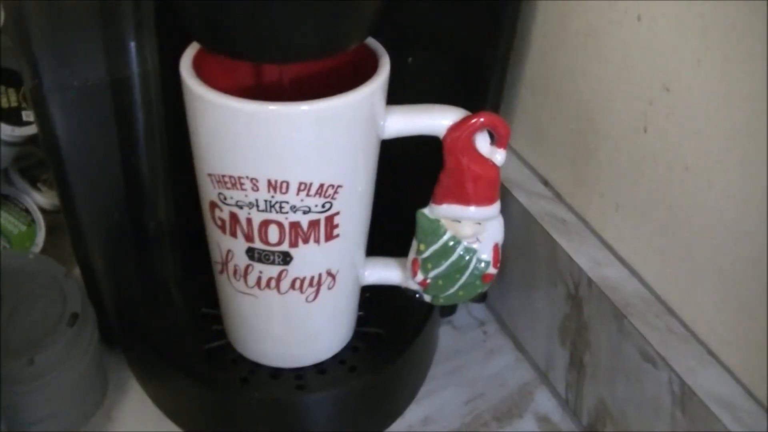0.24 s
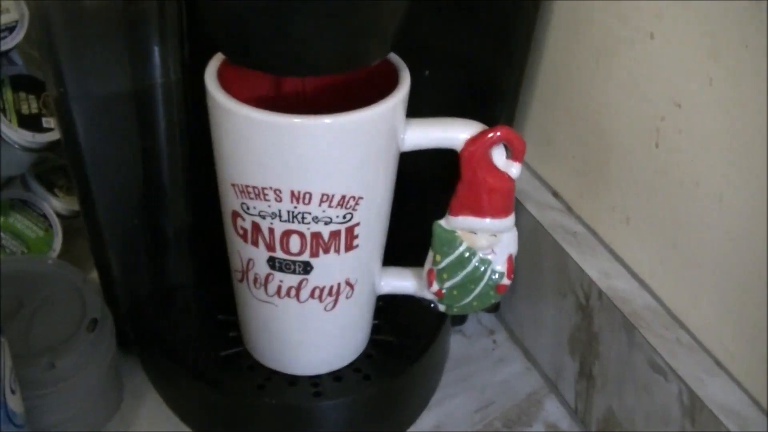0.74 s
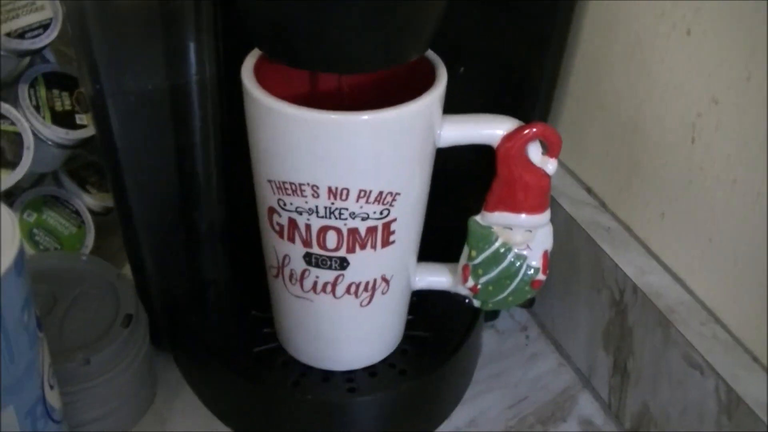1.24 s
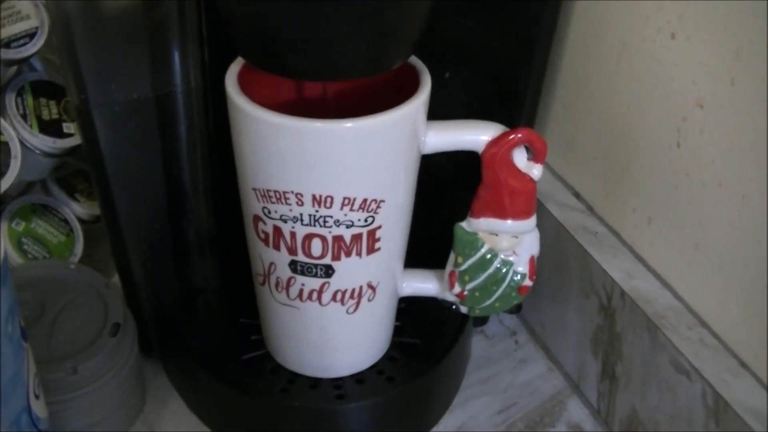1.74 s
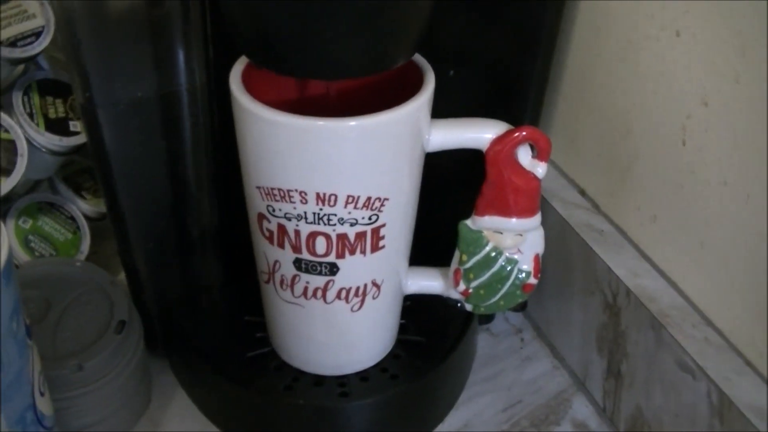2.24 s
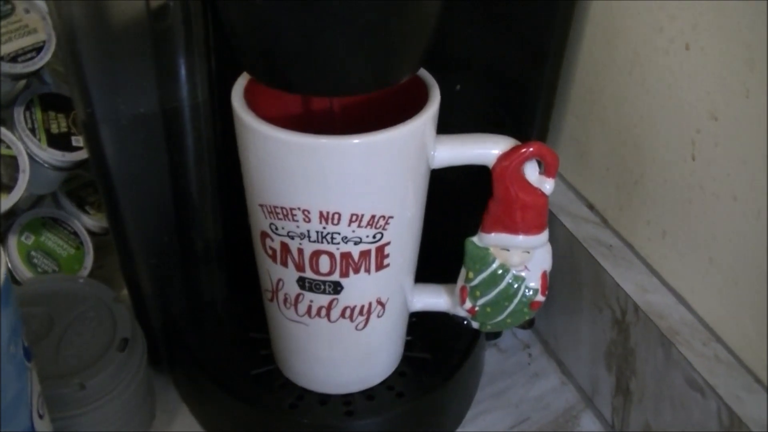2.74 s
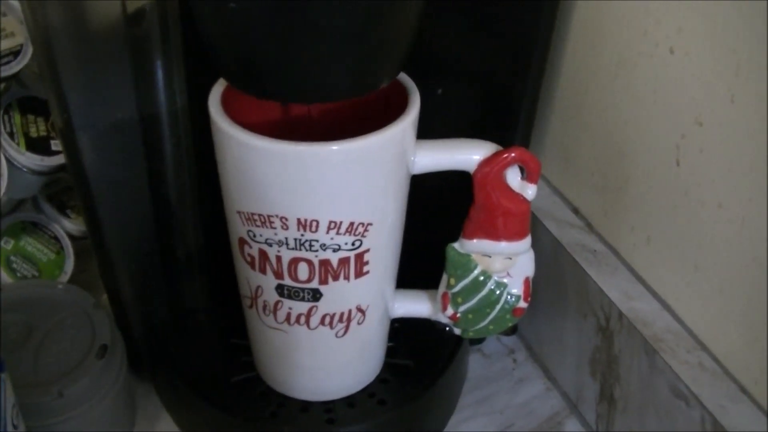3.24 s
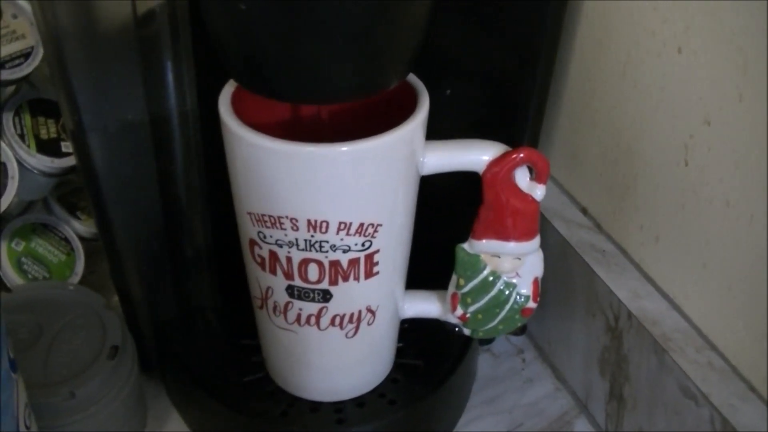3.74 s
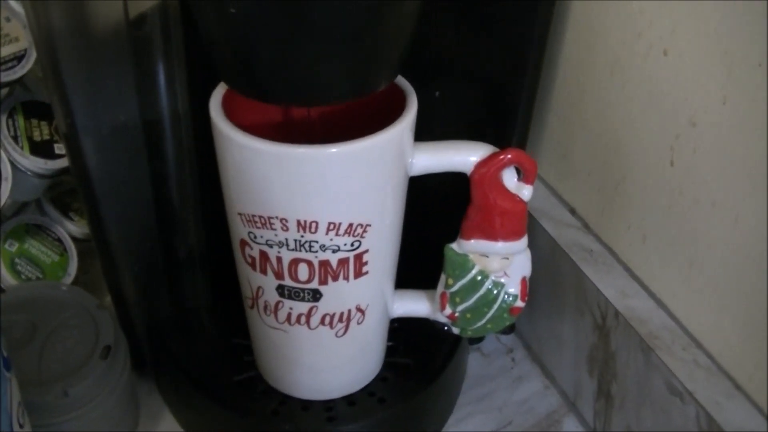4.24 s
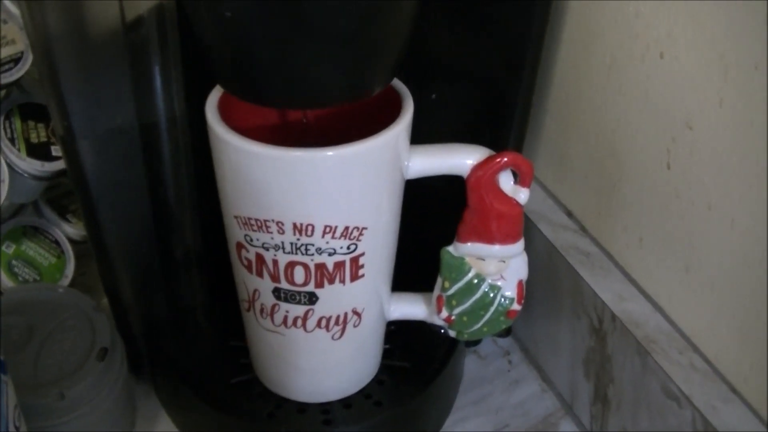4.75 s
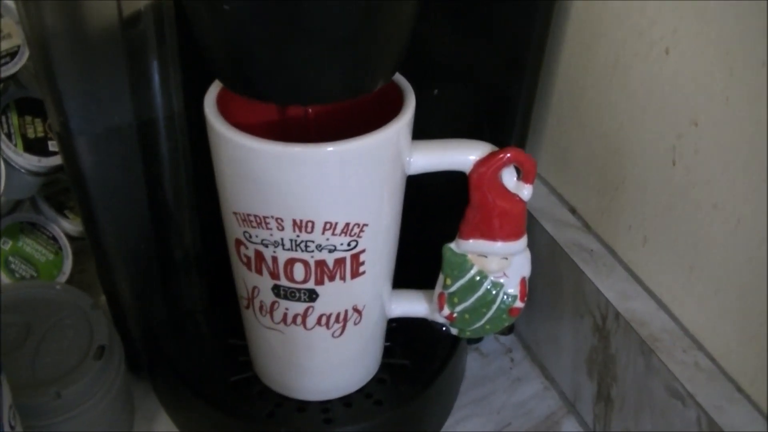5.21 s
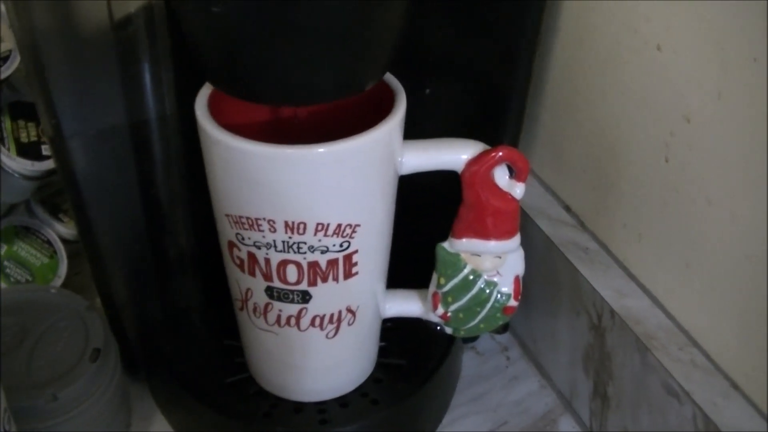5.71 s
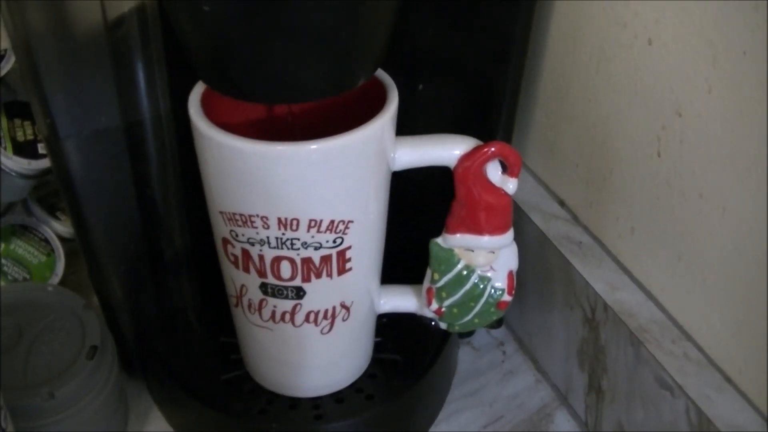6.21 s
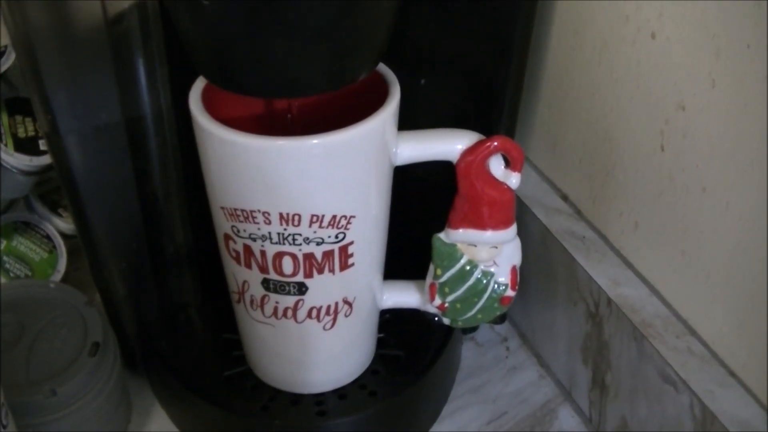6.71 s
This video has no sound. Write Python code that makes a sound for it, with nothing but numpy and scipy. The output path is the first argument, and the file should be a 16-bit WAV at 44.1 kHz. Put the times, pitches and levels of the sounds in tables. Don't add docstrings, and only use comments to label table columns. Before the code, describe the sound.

A continuous buzzing hum with a hard plastic rattle and a hiss of water through tubes, already running at the start. Two sharp splats in the mug open it, followed by irregular drips and small bubble plinks. A very faint high electronic whine sits above. After about six seconds the motor cuts off quickly, leaving uneven bubbly pops, wheezes and spray. Close stereo phone pickup, short counter reflections, faint room tone.

```python
import sys
import numpy as np
from scipy import signal
from scipy.fft import rfft, irfft, next_fast_len
from scipy.io import wavfile
from scipy.ndimage import uniform_filter1d

SR = 44100
rng = np.random.default_rng(int(sys.argv[2]) if len(sys.argv) > 2 else 0)


def wrap_up_sound(samples):
    columns = np.atleast_2d(samples).T
    tamed = np.clip(columns, -1, 1)
    steps = np.round(tamed * 32767).astype(np.int16)
    wavfile.write(sys.argv[1], SR, steps)


def decibels_to_gain(level_db):
    exponent = np.asarray(level_db, float) / 20
    return 10 ** exponent


N = 307377
TIME = np.arange(N) / SR
SIZE = next_fast_len(N + 8192)
HZ = np.maximum(np.arange(SIZE // 2 + 1) * SR / SIZE, 1)


def unit(x):
    return x / np.sqrt(np.mean(x ** 2))


def along(table):
    hz, value = np.transpose(table)
    return np.interp(np.log(HZ), np.log(np.maximum(hz, 1)), value)


def colour(x, table):
    cepstrum = irfft(np.log(decibels_to_gain(along(table))), SIZE)
    cepstrum[1:SIZE // 2 + 1] *= 2
    cepstrum[SIZE // 2 + 1:] = 0
    response = np.exp(rfft(cepstrum))
    return irfft(rfft(x, SIZE) * response, SIZE)[:N]


def resonate(x, modes):
    gain = 0
    for k, (hz, width, db) in enumerate(modes):
        damping = 1j * HZ * width
        gain = gain + (-1) ** k * decibels_to_gain(db) * damping / (hz ** 2 - HZ ** 2 + damping)
    return irfft(rfft(x, SIZE) * gain, SIZE)[:N]


def columns(table):
    s, *rest = np.transpose(table)
    on = (TIME >= s[0]) & (TIME <= s[-1])
    return on, [np.interp(TIME, s, c) for c in rest]


def walk(rate, time=TIME):
    knots = uniform_filter1d(rng.standard_normal(400), size=2) * 2.08
    return np.interp(time * rate, np.arange(400), knots)


def grains(per_s, spread_db):
    chance = rng.random((2, N))
    happens = chance[0] < per_s / SR
    size = decibels_to_gain(-spread_db * np.log(1 - 0.95 * chance[1]))
    return happens * size * rng.choice([-1, 1], N)


def add(out, s, sound):
    i = int(s * SR)
    out[i:i + len(sound)] += sound[:N - i]


def fade(t60, rise):
    t = TIME[:8000]
    return (1 - np.exp(-t / rise)) * np.exp(-np.log(1000) * t / max(t60, 0.002))


def burst(t60, rise):
    return fade(t60, rise) * rng.standard_normal(8000)


def bubble(hz, glide):
    t = TIME[:8000]
    return np.sin(2 * np.pi * hz * t * (1 + glide * t))


# frequency in Hz, level in dB per Hz.
ROOM_TONE = [(12, -84), (20, -54), (216, -13), (738, -1), (976, -9), (1120, -6), (2750, -11), (3630, -18),
             (9950, -25), (14300, -32), (16000, -49)]


def kitchen():
    mid, side = (unit(colour(rng.standard_normal(N), ROOM_TONE)) for _ in range(2))
    return decibels_to_gain(-56) * (mid + 0.71 * side * np.array([[1], [-1]]))


# frequency in Hz, level in dB.
HEATER_TONES = [(9926, -67), (10016, -59), (10106, -71)]


def whine():
    load = decibels_to_gain(np.interp(TIME, [6.12, 6.18], [0, -8]))
    out = 0
    for hz, db in HEATER_TONES:
        level = decibels_to_gain(db + 0.6 * walk(6))
        out = out + level * np.cos(2 * np.pi * hz * TIME + 0.2 * walk(22))
    return load * out


# start in seconds, peak in dB, dull body against tick in dB.
DROP_HITS = [(0.8434, -48, -3), (0.8982, -42, 5.5), (1.3038, -31.5, -10), (1.3452, -40, -9),
             (1.5438, -35, -13), (1.647, -30.5, -5), (2.0636, -45, -6), (2.2262, -41, 3.5),
             (2.84, -41, -20), (3.1446, -44, -7), (3.1596, -27, -9), (3.3472, -45, -5), (3.5487, -26, -21),
             (3.8161, -37, 1), (3.9932, -41, -7), (4.5, -42, -10), (4.7006, -33, -2), (5.5347, -36, -13),
             (6.2052, -34, 6.5), (6.2596, -44, -10), (6.5105, -34.5, 2), (6.6886, -38, -6),
             (6.7065, -37, -10), (6.7494, -43, -7), (6.8068, -44, 1), (6.8343, -38, -9), (6.8552, -43, 3)]
# start in seconds, peak in dB, pitch in Hz.
DROP_BUBBLES = [(.02, -27, 2490), (.378, -27, 2300), (.515, -30, 3700), (.535, -29, 2800),
                (.545, -25, 2220), (.575, -28, 2600), (0.899, -26, 2500), (.898, -32, 4080),
                (1.304, -25, 3970), (1.304, -28, 2900), (1.6, -35, 930), (2.2, -28, 924),
                (2.204, -32, 1280), (2.88, -40, 920), (3.5, -36, 910), (3.789, -33, 1224), (4.7, -30, 1390),
                (5.06, -31, 1230)]


def drops():
    tick, body, ring = np.zeros((3, N))
    for s, db, body_db in DROP_HITS:
        add(tick, s, decibels_to_gain(db + 2) * burst(0.024, 0.00063))
        add(body, s, decibels_to_gain(db + body_db) * burst(0.012, 0.0005))
    for s, db, hz in DROP_BUBBLES:
        add(ring, s, decibels_to_gain(db) * fade(50 / hz, 0.001) * bubble(hz, 1.5))
    bright = resonate(tick, [(10400, 3200, 1), (12600, 2300, -14)])
    dull = resonate(body, [(5000, 13000, 5.4)])
    return bright + dull + ring


# start in seconds, spray in dB, mug ring in Hz,
# ring against spray in dB, snap against spray in dB.
SLUGS = [
    (0.0703, -24, 1150, -12, 13.5),
    (0.1205, -20.5, 852, -1.5, 13.5),
    (6.2036, -25, 1280, -4, -20),
    (6.509, -31.5, 1010, 3, -15),
]
# frequency in Hz, width in Hz, level in dB.
SNAP_MODES = [(1470, 1300, -10), (2600, 590, -3), (4000, 400, -5), (6300, 600, 2), (8400, 1900, -10),
              (10600, 1500, 3), (12800, 2800, -9.5)]
# frequency in Hz, width in Hz, level in dB.
SPLASH_MODES = [(1300, 860, -1.5), (2700, 600, -0.5), (4160, 750, -8), (6400, 820, -3.5),
                (10400, 3200, -8.5)]


def splats():
    snap, spray, ring = np.zeros((3, N))
    spray_t60_s = 0.041
    for s, db, hz, ring_db, snap_db in SLUGS:
        add(snap, s, decibels_to_gain(db + snap_db) * burst(0.007, 0.0004))
        add(spray, s, decibels_to_gain(db) * burst(spray_t60_s, 0.002))
        add(spray, s + 0.007, decibels_to_gain(db - 1) * burst(spray_t60_s, 0.001))
        air = bubble(1.04 * hz, -2.5) + 0.4 * bubble(0.78 * hz, -1)
        add(ring, s + 0.005, decibels_to_gain(db + ring_db) * fade(0.075, 0.0015) * air)
    return decibels_to_gain(4) * resonate(snap, SNAP_MODES) + decibels_to_gain(4) * resonate(spray, SPLASH_MODES) + ring


# time in seconds, gurgle in dB,
# whistle against gurgle in dB, spray against gurgle in dB.
STEADY_FLOW = [
    (6.14, -43.5, -19, -17),
    (6.274, -51.5, -9, -10),
    (6.97, -49.5, -7, -5),
]
# start in seconds, peak in dB, mug ring in Hz, whistle against gulp in dB.
GULPS = [(6.159, -40, 1130, -9), (6.182, -35, 1120, -18), (6.241, -40, 787, -4), (6.279, -50, 746, -15),
         (6.298, -33.5, 754, -12), (6.322, -39.5, 645, -5), (6.352, -44, 660, -3), (6.397, -39.5, 766, -2),
         (6.429, -48, 738, -18), (6.465, -44, 696, -11), (6.482, -33.5, 633, -9), (6.545, -31, 1030, -2),
         (6.555, -31.5, 660, -10), (6.579, -32.5, 670, -4), (6.596, -35, 720, -20), (6.617, -32, 786, -5),
         (6.634, -49, 477, -20), (6.68, -43.5, 627, 7), (6.699, -43, 773, -16), (6.717, -33, 735, -8),
         (6.749, -41, 710, 5), (6.769, -46, 1120, -18), (6.801, -50, 856, 7), (6.826, -46, 860, -12),
         (6.856, -40.5, 656, 5), (6.89, -53, 740, 2), (6.917, -34.5, 830, 2.5), (6.939, -36, 770, -15),
         (6.953, -34, 880, -10)]
# frequency in Hz, level in dB per Hz.
GURGLE_TONE = [(88, -73), (150, -29), (215, -11.5), (278, -21), (494, -5), (546, -23), (625, -3.5),
               (723, -8), (1020, -12), (1210, -9.5), (1610, -12), (1720, -16), (2200, -21), (2860, -39),
               (4840, -120)]
# frequency in Hz, level in dB per Hz.
SPRAY_TONE = [(2060, -53), (3500, 4), (4600, 3), (5190, 2), (5640, 5), (7950, -3.5), (8630, 0.5),
              (12900, -8), (16000, -11)]


def sputter():
    on, (steady_db, whistle_db, spray_db) = columns(STEADY_FLOW)
    push = on * decibels_to_gain(steady_db) * np.array([np.ones(N), decibels_to_gain(whistle_db), decibels_to_gain(spray_db)])
    ring = np.zeros(N)
    for s, db, hz, pipe_db in GULPS:
        fade_s = 104 / hz
        for layer, rel_db in zip(push, [0, pipe_db, -12.5 + 0.55 * pipe_db]):
            add(layer, s, decibels_to_gain(db + rel_db - 10.5) * fade(fade_s, 0.0026))
        add(ring, s, decibels_to_gain(db - 1.5) * fade(0.6 * fade_s, 0.003) * bubble(hz, 1.5))
        nozzle_db = db + min(pipe_db, 0) - 6
        add(ring, s + 0.0031, decibels_to_gain(nozzle_db) * fade(0.032, 0.002) * bubble(2780, 0))
    pops = unit(grains(per_s=900, spread_db=3)) + 0.52 * rng.standard_normal(N)
    gurgle = unit(colour(pops, GURGLE_TONE))
    puffs = grains(per_s=770, spread_db=4.5) + 0.13 * pops
    pipe_modes = [(2150, 170, 8.5), (2765, 150, 14), (3360, 170, 6), (4480, 250, 2.4)]
    whistle = unit(resonate(puffs, pipe_modes))
    spray = unit(colour(pops, SPRAY_TONE))
    froth = 0.98 + 0.56 * walk(55)
    return push[0] * gurgle + push[1] * whistle + push[2] * spray + ring * froth


# place in turns, strength in dB.
VALVE_KNOCKS = [(0.089, -3.5), (.42, -7.5), (0.522, -3), (0.771, -7.5), (0.899, -1.5)]


def knocks(turn):
    place, db = np.transpose(VALVE_KNOCKS)
    due = np.arange(int(turn[-1]))[:, None] + place
    chance = rng.standard_normal((2, *due.shape))
    at = np.interp(due, turn, TIME * SR) + 1.53 * chance[0]
    size = decibels_to_gain(db + 1.35 * chance[1])
    out = np.zeros(N + 1)
    np.add.at(out, at.astype(int), size * (1 - at % 1))
    np.add.at(out, at.astype(int) + 1, size * (at % 1))
    return out[:N]


# overtone number, level in dB.
VALVE_OVERTONES = [(1, -39.5), (2, -21.5), (3, -16), (4, -6.5), (5, 0.5), (6, -13.5), (8, -9)]
# frequency in Hz, width in Hz, level in dB.
HOUSING_RINGS = [(304, 40, -17.5), (420, 37, -10.5), (592, 77, -13), (660, 25, -18.5), (770, 90, -2),
                 (850, 68, -9.5), (1098, 41, -5), (1140, 36, -3.5), (1185, 24, 2), (1260, 30, -14),
                 (1507, 146, -13.5), (1690, 43, -11.5), (1770, 54, -7), (1873, 55, -16)]
# frequency in Hz, level in dB.
OFF_RING = [(30, -48), (150, -47.5), (210, -31.5), (400, -19.5), (700, -27.5), (1900, -18.5)]


def partial_gain(k):
    hz = k * 30
    at, rest_db = np.transpose(OFF_RING)
    power = decibels_to_gain(np.interp(np.log(hz), np.log(at), rest_db)) ** 2
    for ring_hz, width, db in HOUSING_RINGS:
        power += decibels_to_gain(db) ** 2 / (1 + (2 * (hz - ring_hz) / width) ** 4) ** 2
    power += sum(decibels_to_gain(db) ** 2 for n, db in VALVE_OVERTONES if 3 * round(n) == k)
    return np.sqrt(power)


# place in turns, strength in dB.
DEEP_BLOWS = [(.279, -2.2), (.676, -2.6), (.843, 0)]
# place in turns, strength in dB.
MIDDLE_BLOWS = [(.168, 0), (.454, -4.3), (.87, -4.7)]
# multiple of the shaft rate, level in dB.
MOTOR_LINES = [(94, -11.5), (112, -14), (114, -25.5)]


def hum(turn, drone_db):
    partials = 64
    time, turn, drone_db = TIME[::4], turn[::4], drone_db[::4]
    lines = [(k, partial_gain(k)) for k in range(1, partials + 1)]
    lines += [(round(k), decibels_to_gain(db)) for k, db in MOTOR_LINES]
    out = 0
    for k, gain in lines:
        blows = DEEP_BLOWS if k < 23 else MIDDLE_BLOWS if k < 46 else VALVE_KNOCKS
        place, blow_db = np.transpose(blows)
        start = np.angle(np.sum(decibels_to_gain(blow_db) * np.exp(-2j * np.pi * k * place)))
        waver = 0.04 + 0.003 * min(k, partials)
        swell_db = 5 * waver * walk(5, time) + (drone_db if k == 6 else 0)
        out += gain * decibels_to_gain(swell_db) * np.cos(2 * np.pi * k * turn + start + waver * walk(8, time))
    return np.sqrt(2) * signal.resample_poly(out, 4, 1)[:N]


# time in seconds, fifteenth multiple of the shaft rate in Hz.
MOTOR_SPEED = [(0, 446.4), (.08, 450), (.6, 449.9), (1.1, 450.6), (1.62, 450.4), (1.86, 448.8),
               (2.17, 448.9), (2.46, 447.5), (2.8, 447.2), (3.03, 448), (3.23, 450.6), (3.64, 451),
               (4.05, 449.7), (4.37, 451.9), (4.95, 452.1), (5.74, 451.2), (6.1, 447.6)]
# frequency in Hz, level in dB per Hz.
RUSH_TONE = [(120, -44), (250, -29), (450, -17.5), (620, -14.5), (790, -8), (1000, -14.5), (1150, -10),
             (1350, -13), (2200, -12.5), (3350, -15), (4500, -22.5), (7500, -28), (10300, -27),
             (16000, -50)]
# frequency in Hz, width in Hz, level in dB.
RATTLE_MODES = [(1700, 280, -18), (2178, 100, 7), (2600, 41, 5), (2724, 110, -0.5), (3167, 88, 4),
                (3422, 74, 5), (3690, 50, -5), (4150, 53, -3.5), (4290, 91, -11), (5040, 160, -11.5),
                (9640, 430, -15)]


def pump():
    coasting_s = np.maximum(TIME - 6.13, 0)
    speed_hz = np.interp(TIME, *np.transpose(MOTOR_SPEED))
    partial_hz = np.maximum(speed_hz - 200 * coasting_s, 1)
    drone_db = 2.2 * (partial_hz - 450) + 0.7 * TIME
    hum_db = -44.5 - 600 * coasting_s
    rush_db = -44 - 230 * coasting_s
    turn = np.cumsum(partial_hz) / SR / 15
    blows = knocks(turn)
    after_knock = unit(signal.lfilter([1], [1, -np.exp(-1 / (0.002 * SR))], blows))
    flow = 0.9 + 0.2 * after_knock
    rush = unit(colour(flow * rng.standard_normal(N), RUSH_TONE)) * decibels_to_gain(0.36 * walk(12))
    fizz_modes = [(9050, 250, 1), (9780, 250, 0), (10780, 350, 0)]
    fizz = unit(resonate(flow * rng.standard_normal(N), fizz_modes))
    fizz = fizz * decibels_to_gain(np.interp(TIME, [1.5, 4.5], [-23, -15.5]))
    rattle = unit(resonate(blows, RATTLE_MODES)) * decibels_to_gain(-2)
    return decibels_to_gain(hum_db) * hum(turn, drone_db) + decibels_to_gain(rush_db) * (rush + rattle + fizz)


# frequency in Hz, left minus right in dB.
TILT = [(60, -1), (110, -2), (200, -5.5), (380, -6.3), (700, -4.2), (1290, -2.6), (2380, -0.5),
        (4400, -1.2), (8120, -1.8), (15000, 0.5)]
# frequency in Hz, lead of the left in radians.
LEAD = [(200, .1), (500, 0.35), (1500, 0.31), (4500, 0.084), (8000, 0.85), (14000, .1)]
# frequency in Hz, level in dB.
REFLECTIONS = [(60, -20), (300, -30), (1000, -26), (2500, -16), (5000, -8), (9000, -11), (13000, -4)]


def ports(x):
    half = decibels_to_gain(along(TILT) / 2) * np.exp(0.5j * along(LEAD))
    echo = rng.standard_normal(N) * np.exp(-np.log(1000) * TIME / 0.11)
    echo = rfft(echo / np.sqrt(np.sum(echo ** 2)), SIZE) * decibels_to_gain(along(REFLECTIONS))
    return irfft(rfft(x, SIZE) * np.array([half + echo, 1 / half - echo]), SIZE)[:, :N]


def scene():
    return kitchen() + ports(whine() + drops() + splats() + sputter() + pump())


def low_pass(x):
    return signal.sosfilt(signal.butter(12, 16480, fs=SR, output="sos"), x)


# frequency in Hz, level in dB.
MIC_NOISE = [(20, -62), (60, -65.5), (100, -51), (160, -69), (3000, -86), (9000, -77), (13000, -58.5),
             (16000, -63)]


def record(dry):
    thin = signal.sosfilt(signal.butter(4, 125, "high", fs=SR, output="sos"), dry)
    thin = signal.sosfilt(signal.butter(6, 14800, fs=SR, output="sos"), thin)
    hiss = 0.44 * rng.standard_normal(dry.shape) + 0.66 * rng.standard_normal(N)
    noise = np.array([colour(port, MIC_NOISE) for port in hiss])
    return low_pass(thin + noise)


dry = scene()
out = record(dry)
wrap_up_sound(out)
```